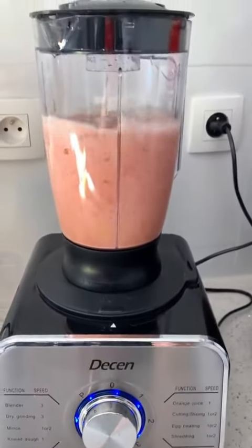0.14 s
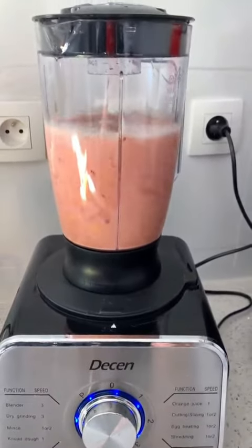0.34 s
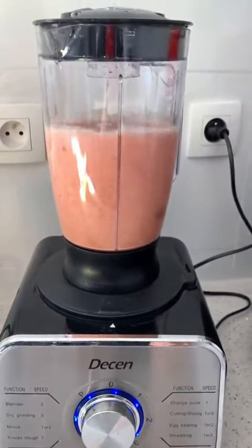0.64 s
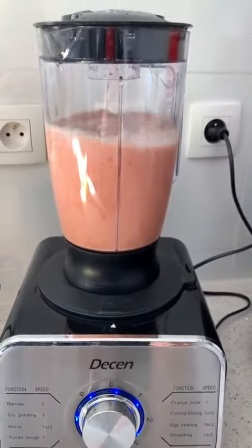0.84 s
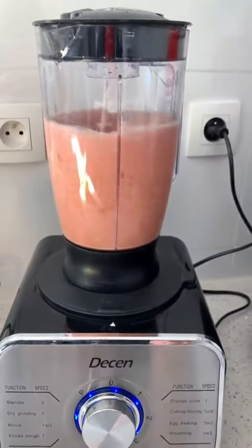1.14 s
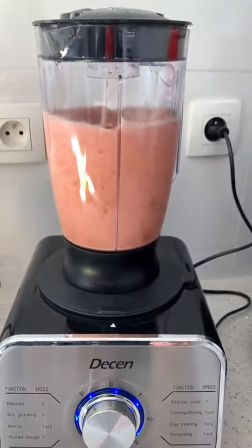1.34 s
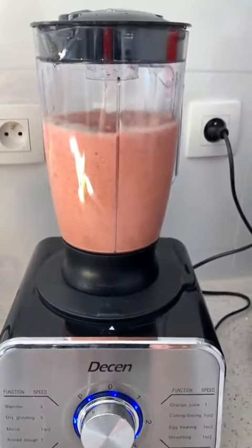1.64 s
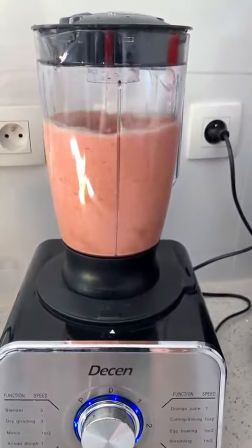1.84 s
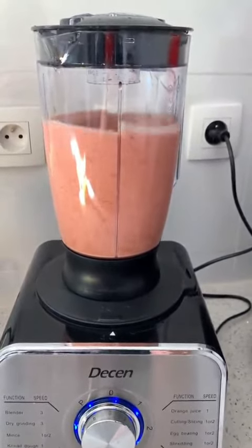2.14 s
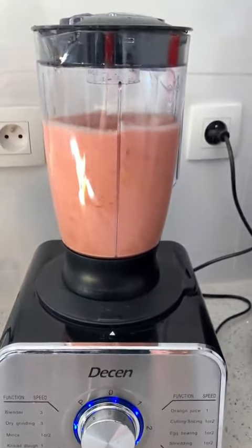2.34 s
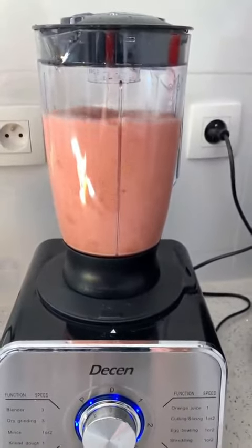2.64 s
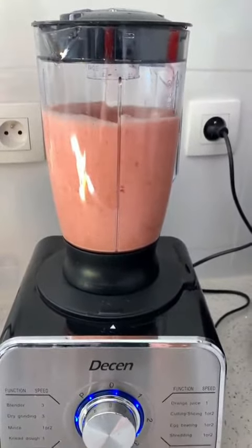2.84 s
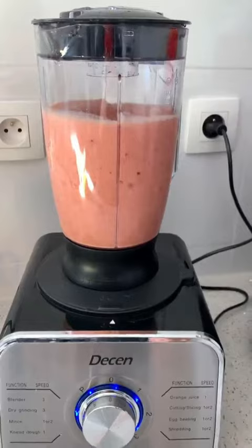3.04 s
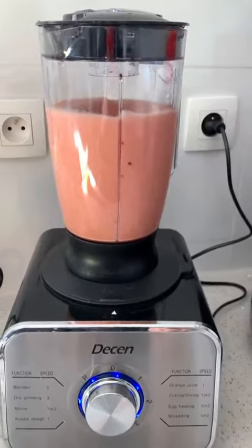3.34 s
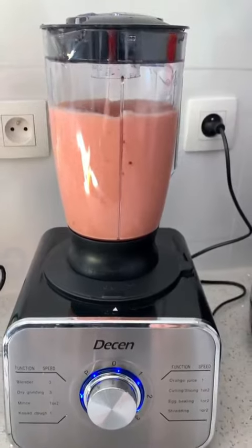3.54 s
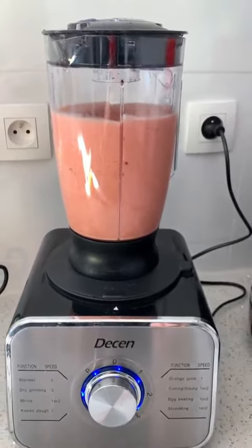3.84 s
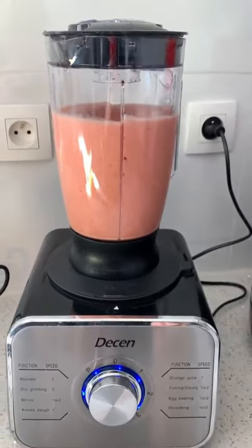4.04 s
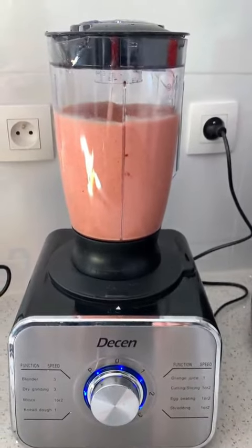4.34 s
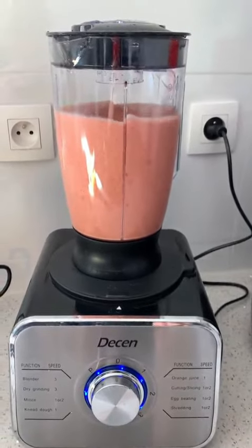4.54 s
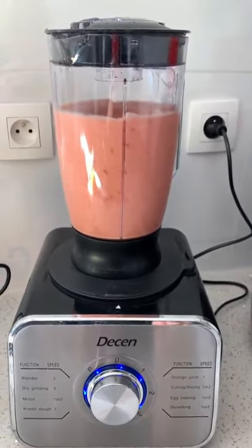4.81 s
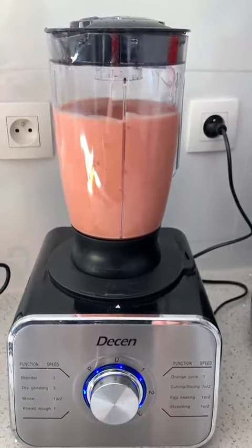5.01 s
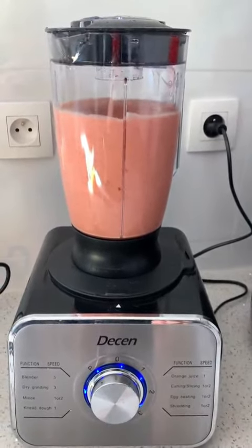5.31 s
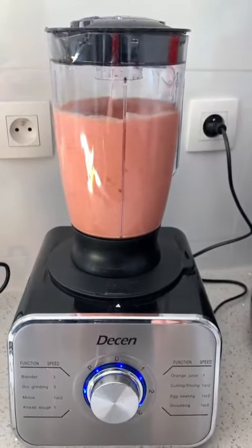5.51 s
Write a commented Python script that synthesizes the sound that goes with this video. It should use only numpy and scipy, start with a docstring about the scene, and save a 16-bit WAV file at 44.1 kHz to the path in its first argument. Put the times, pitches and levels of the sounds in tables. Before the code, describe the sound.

A blender full of fruit runs continuously on a kitchen counter, heard about half a metre away in stereo through a phone. It starts mid-roar with a strong surge, briefly dips near 0.2 s, then grinds loud and rough until about 1.2 s: dense mid-range churning, gritty hiss, low boom and many tiny sharp cracks. Around 1.2 s the load suddenly drops; the low motor hum, near 168 Hz, slides up toward 190 Hz and the roar returns more moderately. Near 2.25 s a lump knocks, and from 2.4 to 2.6 s a rapid clatter of thumps and cracks coincides with a short surge. Afterwards the sound is smoother and quieter, a fluttering liquid rush with uneven low buzz, the hum settling slightly above 200 Hz. Thin wavering whines near 1.8 kHz surface briefly, and soft knocks occur around 4.2, 4.7 and 5.2 s. It is still running at the end, about 5.6 s.

```python
"""A blender roars through fruit on a kitchen counter: pulp churns, lumps crack, the motor hums higher as the mix thins.
Heard half a metre off through a phone's two microphone ports. Noise and short tone grains ring the jar modes,
following the load on the blades; lumps strike; wandering low modes of the motor base boom and buzz;
the shaft hums once and twice a turn; the jar wall sings in brief strands of tone."""
import sys
import numpy as np
from scipy import signal
from scipy.fft import rfft, irfft
from scipy.io import wavfile
from scipy.ndimage import uniform_filter1d

SR = 44100
rng = np.random.default_rng(int(sys.argv[2]) if len(sys.argv) > 2 else 0)


def volts_from_decibels(level):
    """Turn decibel levels (scalar or array-like) into linear amplitude factors."""
    exponent = np.asarray(level, float) / 20
    return 10 ** exponent


def int16_out(signal):
    """Quantize to a 16-bit WAV file."""
    q = np.round(np.clip(np.atleast_2d(signal).T, -1, 1) * 32767)
    wavfile.write(sys.argv[1], SR, q.astype(np.int16))


N = 250047
TIME, HZ = np.arange(N) / SR, np.arange(N // 2 + 1) * SR / N

# load on the blades above that of a smooth puree: (time [s], load [dB])
BLADE_LOAD = [(0, 15.5), (.07, 8), (.16, 8), (.21, 1), (.28, 5), (.35, 9.5), (.55, 10), (.9, 6), (1.17, 11),
              (1.2, 6.5), (1.24, -1), (1.285, 0), (1.34, 5), (1.45, 6.5), (1.75, 5), (2.1, 4.5), (2.22, 5),
              (2.27, 0.5), (2.31, 2.5), (2.37, 2), (2.44, 4.5), (2.49, 7), (2.57, 6), (2.61, 1), (3.1, 1.5),
              (3.7, 1), (5.1, 1), (5.67, 0.5)]
# lumps struck by a blade: (time [s], relative level [dB], extra level of the crack [dB])
STRUCK_LUMPS = [(0.022, -38, 13), (0.056, -40, 12), (0.094, -43, 12), (0.15, -46, 6), (0.248, -36.5, 16),
                (0.31, -44, 12), (0.378, -30, 8), (0.41, -44, 8), (0.45, -31, 15.5), (0.485, -36, 14),
                (0.508, -29, 12), (0.531, -31, 20), (0.608, -43, 9), (0.629, -40, 9), (0.68, -44, 13),
                (0.743, -34, 16), (0.9434, -34, 18), (0.955, -33, 18), (1.051, -31.5, 14), (1.1, -45, 10),
                (1.175, -38, 10), (2.029, -27, -1), (2.2566, -22, 7.5), (2.263, -29, 0), (2.41, -32, 3),
                (2.425, -35, 4), (2.4365, -25, 1), (2.45, -39, 3), (2.463, -26, 7), (2.472, -40, 4),
                (2.486, -20.5, 10), (2.4955, -27, -6), (2.504, -28, -2), (2.512, -36, -3), (2.52, -42, 4),
                (2.54, -33, 8), (2.554, -40, 7), (2.575, -46, 1), (3.7504, -54, -7), (3.7907, -36, -4),
                (4.1793, -33, 10), (4.6948, -25, -8), (4.9194, -29.5, -13), (5.181, -25, -7),
                (5.2191, -22.5, -19), (5.3696, -26, -6)]
# how thick the pulp is, heard in the low thud: (time [s], relative level [dB])
PULP_THICKNESS = [(0, 4.5), (.6, 4), (1.17, 2), (1.35, -2), (2.4, -0.5), (2.7, -3), (5.67, -4)]
# broad colour of the churn before its zones are levelled: (frequency [Hz], relative density [dB per Hz])
CHURN_COLOUR = [(60, -15), (200, 0), (480, 0), (620, -1.5), (1200, 2.5), (2300, -6), (2700, -4.5),
                (5500, -11), (6400, -13), (8000, -9.5), (8400, -13), (9700, -16.5), (13000, -16),
                (15600, -18.5), (15800, -62)]
# jar and lid modes: (frequency [Hz], width [Hz], lift before flaring [dB])
JAR_MODES = [(622, 11, 7), (659, 34, 13), (799, 122, 8), (1001, 26, 9.5), (1062, 18, 7), (1190, 21, 7),
             (1255, 14, -1.5), (1298, 27, 8.5), (1355.5, 13.6, 10), (1497, 5.4, 9), (1597, 19, 4),
             (1790, 42, 5.5), (1865, 40, 5.5), (1956, 17, 3.5), (2050, 68, 7.5), (2210, 41, 6),
             (2326, 50, 9), (2463, 21, 3), (3030, 31, 5), (3350, 17, 5), (3805, 41, 4), (4140, 390, 1.5),
             (6720, 196, 8), (7400, 190, 2.5), (7750, 73, 5.5), (10340, 320, 3)]
# boom of the motor base on the counter: (frequency [Hz], line width [Hz], relative level [dB])
BASE_MODES = [(168.2, 83.7, -9.5), (220.7, 48, -13.5), (270.2, 62.5, -8.5), (305.8, 28.1, -1.5),
              (335.9, 31.35, 0.5), (362, 25.4, -8.5)]
# brief swells of the low boom: (time [s], rise [dB])
BOOM_SWELLS = [(.012, 0.5), (.15, 7), (0.176, 12), (.22, 13.5), (.27, 10), (0.314, 8), (.38, 7),
               (.455, 6.5), (.525, 6), (0.553, 8), (.587, 5.5), (.627, 8), (.68, 1), (.73, 1), (0.796, 9),
               (.84, 7), (0.919, 7), (1.0, 8), (1.11, 6.5), (1.15, 4), (1.19, 3), (1.24, 9), (1.29, 4),
               (1.61, 4), (1.75, 7.5), (2.099, 4), (2.27, 11), (2.54, 3), (2.566, 8), (2.73, 11), (3.05, 0),
               (3.2, 6), (3.25, 6), (3.442, 4), (3.73, 2), (3.8, 5), (4.23, 9), (4.29, 5), (4.44, 4.5),
               (4.65, 4.5), (4.94, 6), (5.2, 8)]
# modes in the low buzz: (frequency [Hz], line width [Hz], relative level [dB])
BUZZ_MODES = [(104.1, 15, 2.5), (117.4, 15.2, -3.5), (74.7, 18.5, -9)]
# course of the buzz before it wavers: (time [s], level [dB])
BUZZ_LEVEL = [(0, -61.5), (.55, -58.5), (1.15, -64.5), (1.5, -66.5), (2.1, -69.5), (2.3, -63.5),
              (3.1, -67.5), (3.25, -62), (3.42, -63), (3.55, -68), (3.67, -66), (3.85, -67.5), (4.1, -71),
              (4.33, -66), (4.9, -69.5), (5.1, -66.5), (5.35, -69), (5.5, -64.5), (5.67, -80)]
# thin whine: frequency [Hz], line width [Hz], level before it wavers [dB]
THIN_WHINE = (1790., 14.6, -63.5)
# shaft before jitter: (time [s], turn rate [Hz], relative hum level [dB], relative octave level [dB])
SHAFT_COURSE = [(0, 167.7, -52, -42), (.08, 166.8, -54, -51), (.2, 168.6, -63, -56), (.5, 170.6, -62, -67),
                (.85, 168.2, -59, -57), (1.1, 165.6, -57.5, -61), (1.25, 170, -61.5, -56),
                (1.4, 186.3, -61.5, -60), (1.7, 190.4, -56.5, -70), (2.25, 197.1, -68, -72),
                (2.62, 194.3, -55.5, -70), (2.85, 199.3, -66.5, -67.5), (3.25, 201.6, -63, -64),
                (3.9, 202, -70, -66.5), (4.19, 209, -60.5, -56.5), (4.3, 206.6, -66, -66.5),
                (4.55, 206.6, -65, -60.5), (5.1, 206.6, -64, -62), (5.67, 206.3, -68, -66)]
# strands of tone from the jar: (time [s], length [s], frequency [Hz], glide [Hz per s], level [dB])
JAR_SINGS = [(0, 0.072, 995, 0, -46.5), (0, .05, 1830, 0, -51), (0.122, 0.063, 1001, 0, -53),
             (.26, 0.18, 1865, 2, -56), (0.291, 0.12, 1353, -100, -49), (0.409, 0.062, 1030, 700, -50),
             (0.442, .06, 1360, 0, -50.5), (.51, 0.052, 2020, 0, -50), (.59, 0.051, 1190, 900, -52),
             (0.593, 0.042, 1770, 0, -53), (.72, .13, 1855, 0, -55), (0.914, 0.078, 1001, 0, -56),
             (1.039, 0.088, 998, 600, -55), (1.132, 0.098, 1780, 0, -56), (2.452, 0.067, 1370, 0, -54),
             (2.471, .06, 1790, 0, -55), (3.449, 0.091, 1790, 0, -53.5), (3.751, 0.073, 1390, 0, -52),
             (3.747, 0.074, 1790, 0, -51.5), (4.13, 0.093, 1792, 0, -55.5), (4.38, .08, 1775, 0, -57),
             (4.59, 0.12, 1781, 0, -57), (4.89, 0.093, 1790, 0, -56), (5.18, 0.13, 1777, 0, -52.5),
             (5.203, 0.033, 2005, 0, -47), (5.4, 0.12, 1790, 0, -53.5)]
# how alike the two channels sound, nearly mono in some treble bands:
# (frequency [Hz], alike part of the power [0-1], left leads by [rad], left minus right [dB])
CHANNEL_ALIKENESS = [(60, .97, 0, -1), (180, .96, 0, -1.3), (344, .94, -.3, -1.6), (520, .5, -1.1, -1.2),
                     (640, .7, -2.3, -2.3), (860, .25, -3.6, -4), (1000, .15, -2, -6), (1300, .2, -2.4, -4),
                     (1550, .33, -5.3, -3), (1800, .6, -6.3, -2.5), (2150, .25, -4.4, -1),
                     (2680, .45, -3.4, -.4), (2800, .93, -3.2, 0), (3000, .94, -3.2, 0),
                     (3100, .9, -3.3, 0), (3300, .92, -3.3, 0), (3450, .6, -3.6, 0), (3600, .8, -3.5, 0),
                     (3700, .55, -3.9, 0), (3900, .55, -4.3, 0), (4550, .5, -3.8, 0), (4750, .88, -3.2, 0),
                     (4930, .9, -3.2, 0), (4980, .96, -3.2, 0), (5400, .96, -3.1, 0), (5520, .7, -2.8, 0),
                     (5800, .6, -2.5, 0), (6400, .5, -1.6, 0), (6800, .76, -1.1, 0), (7500, .78, -.45, 0),
                     (7750, .975, 0, 0), (8500, .99, 0, 0), (9550, .95, 0, 0), (9700, .3, 2.3, 0),
                     (10300, .37, 1.8, 0), (10800, .35, 2.4, 0), (11300, .8, 3.1, 0), (11700, .46, 3.5, 0),
                     (12500, .33, 4.6, 0), (13100, .5, 5.3, 0), (13700, .6, 5.8, 0), (13850, .98, 6.28, 0)]

# layers against the load: (base level at zero load [dB], gain per dB of load [dB])
CHURN_FOLLOW, SPRAY_FOLLOW, BOOM_FOLLOW = (-54, 0.27), (-57.5, 0.8234), (-61.5, 1.3632)


def curve(table):
    """Columns of a table over time."""
    s, *columns = np.transpose(table)
    return [np.interp(TIME, s, c) for c in columns]


def over_hz(table):
    """Columns of a table over log frequency."""
    hz, *columns = np.transpose(table)
    return [np.interp(np.log(HZ + 1), np.log(hz + 1), c) for c in columns]


def unit(x):
    """Scale to rms 1."""
    return x / np.sqrt(np.mean(x ** 2))


def peak(hz, width_hz):
    """Response of one resonance, gain 1 at its centre."""
    return 1j * HZ * width_hz / (hz ** 2 - HZ ** 2 + 1j * HZ * width_hz)


def ring(x, response):
    """Pass a sound through a frequency response."""
    return irfft(rfft(x) * response, N)


def walk(rate):
    """Random levels held 1 / rate s and slewed twice; rms 1."""
    k = max(int(SR / rate), 1)
    held = np.repeat(rng.standard_normal(N // k + 1), k)
    return unit(uniform_filter1d(uniform_filter1d(held, k), k)[:N])


def bursts(times, sizes, decay_s):
    """Envelope that jumps at each time and dies away exponentially."""
    kicks = np.zeros(N)
    np.add.at(kicks, np.clip((times * SR).astype(int), 0, N - 1), sizes)
    return signal.lfilter([1], [1, -np.exp(-1 / (decay_s * SR))], kicks)


def follow(load_db, calm_db, slope):
    """Level of a layer that grows with the load."""
    return calm_db + slope * load_db


def three_noises():
    """Three unrelated noises: one for both channels, the others for one channel each."""
    return rng.standard_normal((3, N))


def tone_grains(rate, length_s, size_db, glide, low_hz, high_hz):
    """Short random tone grains of near-steady pitch that roughen the noise; three unrelated swarms."""
    chance = rng.random((int(3 * rate * N / SR), 3))
    t = np.arange(int(length_s * SR)) / SR
    hz = low_hz + (high_hz - low_hz) * chance[:, 1:2]
    sizes = volts_from_decibels(-size_db * np.log(0.0057 + chance[:, 2:3]))
    tones = sizes * np.sin(2 * np.pi * hz * t * (1 + glide * t / length_s)) * np.hanning(len(t))
    at = (chance[:, :1] * 3 * N).astype(int) + np.arange(len(t))
    return unit(np.bincount(at.ravel(), tones.ravel())[:3 * N].reshape(3, N))


def jar_modes(x, flare_db, rate):
    """Each mode of the jar is driven by the flow past its own patch of wall, so it flares alone."""
    out = x
    for hz, width_hz, db in JAR_MODES:
        patch = x * volts_from_decibels(flare_db * walk(rate))
        out = out + (volts_from_decibels(db) - 1) * signal.lfilter(*signal.iirpeak(hz, hz / width_hz, SR), patch)
    return out


def churn(turns, churn_db, spray_db, thick_db):
    """Pulp rushes round the jar, bits and lumps crack on the blades, and the jar rings with all of it."""
    chance = rng.random((int(110 * N / SR), 2))  # 110 bits a second
    bits = bursts(chance[:, 0] * N / SR, volts_from_decibels(-12.5 - 1.5 * np.log(.01 + chance[:, 1])), 0.0051)
    s, lump_db, hard_db = np.transpose(STRUCK_LUMPS)
    lumps = bursts(s, volts_from_decibels(lump_db - 15), 0.0088)
    cracks = bursts(s, volts_from_decibels(lump_db + hard_db - 15), 0.0097)  # hard lumps crack louder in the treble
    beat = 1 + 0.095 * np.cos(2 * np.pi * turns)  # the flow pulses once a turn

    # thick pulp thuds in the low modes; the swirl sings higher
    thud_db = churn_db + thick_db + 0.5 + 0.5 * walk(25.2)
    thud = volts_from_decibels(thud_db) * (beat + 0.2 * bits) + volts_from_decibels(-18.5) * lumps
    swirl_db = churn_db - 1.0 + 0.42 * walk(21.8)
    swirl = volts_from_decibels(swirl_db) * (beat + 0.12 * bits) + volts_from_decibels(-10.0) * lumps
    hiss_db = 0.3 * churn_db + 0.7 * spray_db - 1.5 + 2.55 * walk(24.88)
    hiss = volts_from_decibels(hiss_db) * (beat + 0.32 * bits) + volts_from_decibels(-28.5) * (lumps + cracks)
    # bits mostly sharpen the spray and its finest mist, which follows the load less
    spray = volts_from_decibels(spray_db - 2.5 + 0.67 * walk(24.86)) * (beat + bits)
    spray = spray + volts_from_decibels(-24.0) * lumps + volts_from_decibels(-18.0) * cracks
    calm_db = SPRAY_FOLLOW[0]
    mist_db = 0.51 * (spray_db - calm_db) + calm_db - 13.7 + 1.2 * walk(14)
    mist = volts_from_decibels(mist_db) * (beat + 0.96 * bits) + volts_from_decibels(-38.0) * (lumps + cracks)

    # the unshared part of the hiss varies in level and rises with each crack
    unshared = volts_from_decibels(3.47 * walk(12) - 0.5) + volts_from_decibels(23.0) * cracks
    hiss = hiss * np.array([np.ones(N), unshared, unshared])

    grains = tone_grains(1500, .011, size_db=0.5, glide=0.011, low_hz=1394.5, high_hz=10003.0)
    flow = three_noises() + volts_from_decibels(-6.5) * grains
    wall = rfft(jar_modes(flow, flare_db=2.5, rate=28)) * volts_from_decibels(over_hz(CHURN_COLOUR)[0])
    # split the spectrum into five zones, one for each drive
    below = [1 / (1 + (HZ / hz) ** 8) for hz in (1450.0, 2655.0, 5480.0, 10150.0)]
    shares = np.sqrt(np.clip(np.diff([0 * HZ, *below, 1 + 0 * HZ], axis=0), 0, 1))
    drives = (thud, swirl, hiss, spray, mist)
    return sum(drive * unit(irfft(wall * share, N)) for drive, share in zip(drives, shares))


def base_levels(load_db):
    """Levels of boom and buzz: the boom grows with the load, wavers and swells briefly; the buzz wavers."""
    swell_s = 0.011  # standard deviation of each bell-shaped swell
    swells = sum(db * np.exp(-.5 * ((TIME - s) / swell_s) ** 2) for s, db in BOOM_SWELLS)
    boom_db = follow(load_db, *BOOM_FOLLOW) + swells + 0.86 * walk(40)
    return boom_db, curve(BUZZ_LEVEL)[0] + 2.5 * walk(23.89)


def wandering_mode(hz, width_hz):
    """A mode kept ringing: a tone of randomly wandering phase, trimmed by a resonance; three unrelated copies."""
    slip = np.cumsum(rng.standard_normal((3, N)), axis=1) * np.sqrt(2 * np.pi * width_hz / SR)
    return ring(np.cos(2 * np.pi * hz * TIME + slip), peak(hz, 4.15 * width_hz) ** 2)


def base(boom_db, buzz_db):
    """Shaking of the load keeps the low modes of the base going; the field coils buzz unevenly; a thin whine."""
    boom = unit(sum(volts_from_decibels(db) * wandering_mode(hz, w) for hz, w, db in BASE_MODES))
    buzz = unit(sum(volts_from_decibels(db) * wandering_mode(hz, w) for hz, w, db in BUZZ_MODES))
    whine_hz, whine_width_hz, whine_db = THIN_WHINE
    whine = volts_from_decibels(whine_db + 2.6 * walk(15)) * unit(wandering_mode(whine_hz, whine_width_hz))
    return volts_from_decibels(boom_db) * boom + volts_from_decibels(buzz_db) * buzz + whine


def shaft(turns, hum_db, octave_db, load_db):
    """The unbalanced shaft hums once and twice a turn; the hum wavers more under load, less in smooth puree."""
    angle = 2 * np.pi * turns
    depth_db = 1.2 + .3 * np.clip(load_db, 0, 8)
    hum = volts_from_decibels(hum_db - 1.5 + depth_db * walk(35)) * np.sin(angle)
    octave = volts_from_decibels(octave_db - 4 + 4 * walk(30)) * np.sin(2 * angle + .5 * walk(50))
    return np.sqrt(2) * (hum + octave)


def sings():
    """Short, slightly rough strands of tone from the jar wall, each swelling and fading."""
    out = np.zeros(N)
    wobble = np.cumsum(5.9 * walk(60)) / SR  # cycles, from a pitch wobble of 5.9 Hz rms
    for s, length_s, hz, glide, db in JAR_SINGS:
        t = TIME - s
        swell = np.sin(np.pi * np.clip(t / length_s, 0, 1))
        out += volts_from_decibels(db) * swell * np.sin(2 * np.pi * (hz * t + glide * t ** 2 / 2 + wobble))
    return np.sqrt(2) * out


def scene():
    """The blender as it reaches the left and right port."""
    turn_hz, hum_db, octave_db = curve(SHAFT_COURSE)
    load_db, = curve(BLADE_LOAD)
    slosh = walk(24.13)  # pulp folds over the blades and clears again
    churn_db = follow(load_db, *CHURN_FOLLOW) + 0.86 * slosh + 0.79 * walk(21.57)
    spray_db = follow(load_db, *SPRAY_FOLLOW) + 0.5 * slosh
    thick_db = curve(PULP_THICKNESS)[0] + 0.47 * walk(18)
    turns = np.cumsum(turn_hz * (1 + .012 * walk(40))) / SR
    common, left, right = churn(turns, churn_db, spray_db, thick_db) + base(*base_levels(load_db))

    # the channels differ in level and phase, and only part of churn and base is common to both
    alike, lead, tilt_db = over_hz(CHANNEL_ALIKENESS)
    side = np.array([[.5], [-.5]])
    tilt = volts_from_decibels(side * tilt_db)
    ports = tilt * np.exp(1j * side * lead)
    direct = ring(common, ports * np.sqrt(alike))
    direct = direct + ring(shaft(turns, hum_db, octave_db, load_db), ports)
    direct = direct + ring(sings(), tilt)
    return direct + ring(np.array([left, right]), ports * np.sqrt(1 - alike))


def roll_off(x):
    """The treble ends steeply here."""
    return signal.sosfilt(signal.butter(12, 15700, fs=SR, output="sos"), x)


def record(dry):
    """The finished mix of both ports as it leaves the phone."""
    return roll_off(dry)


dry = scene()
out = record(dry)
int16_out(out)
```